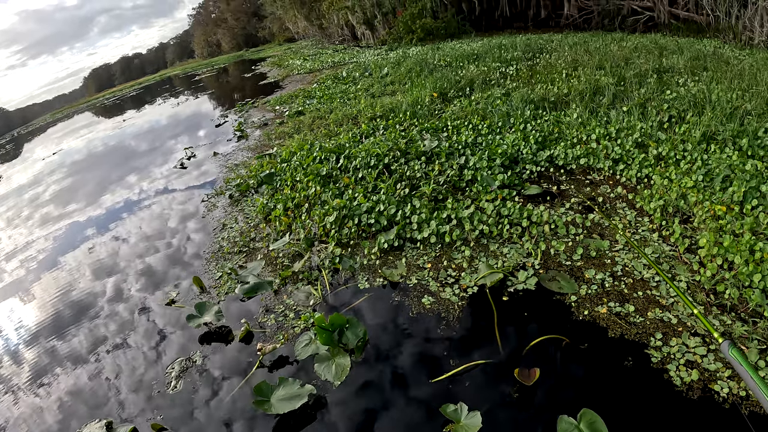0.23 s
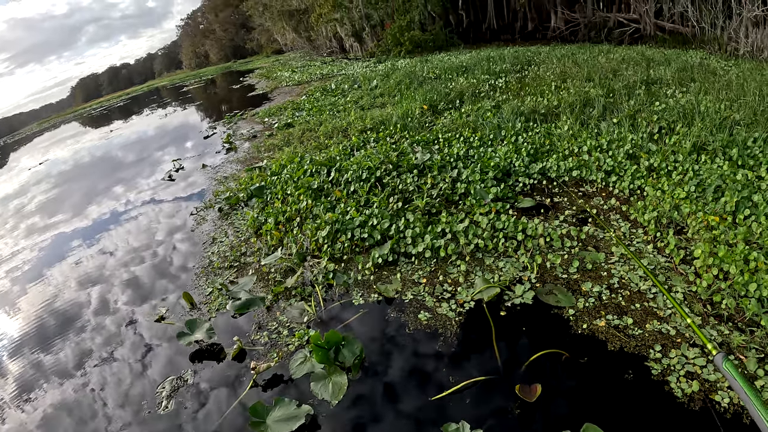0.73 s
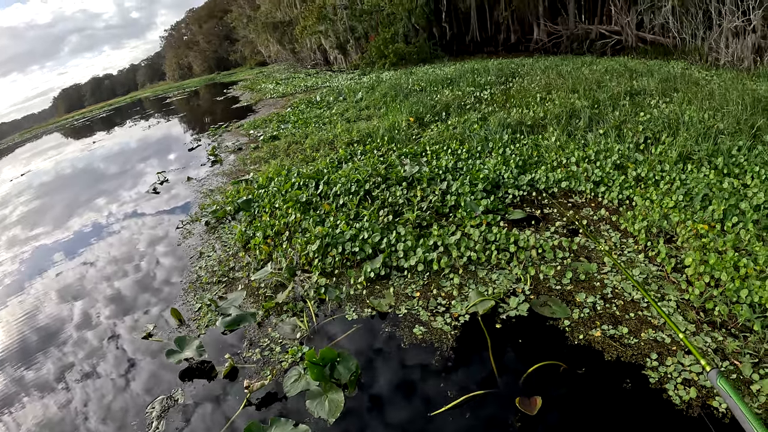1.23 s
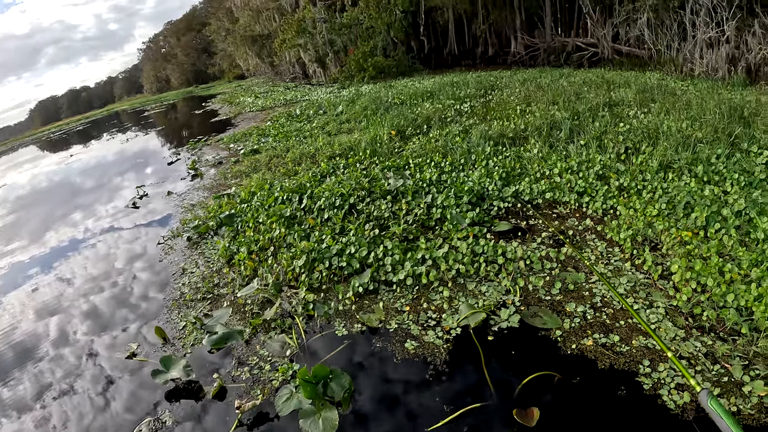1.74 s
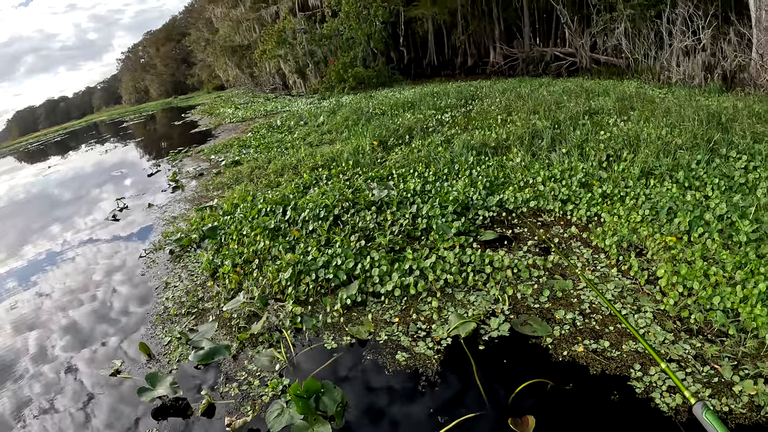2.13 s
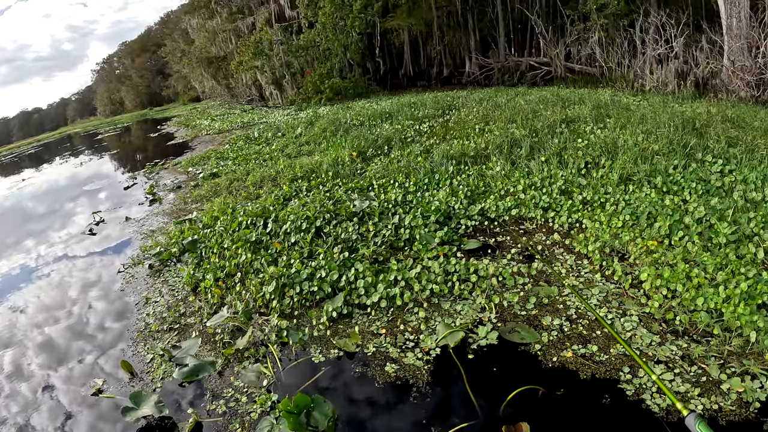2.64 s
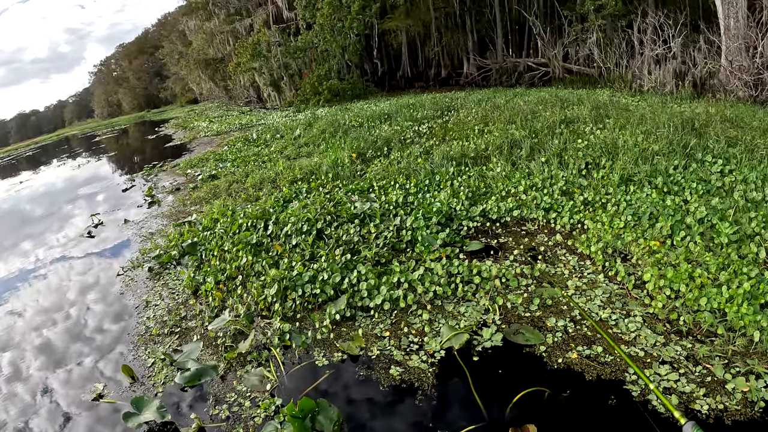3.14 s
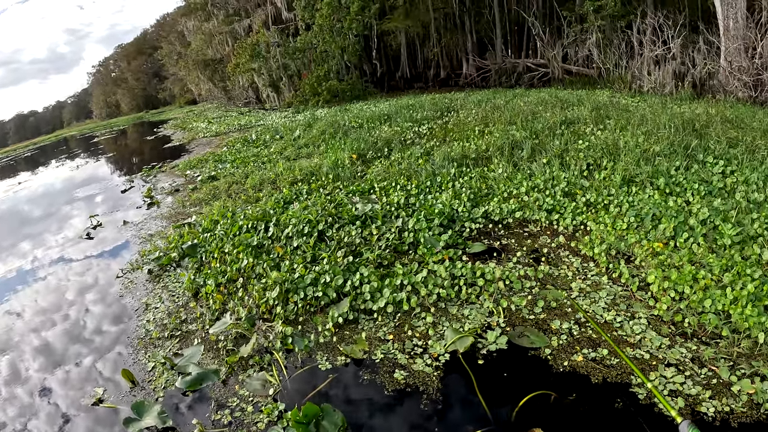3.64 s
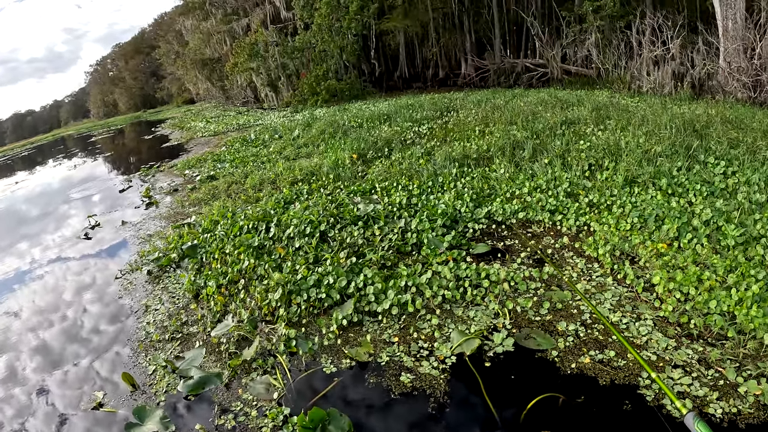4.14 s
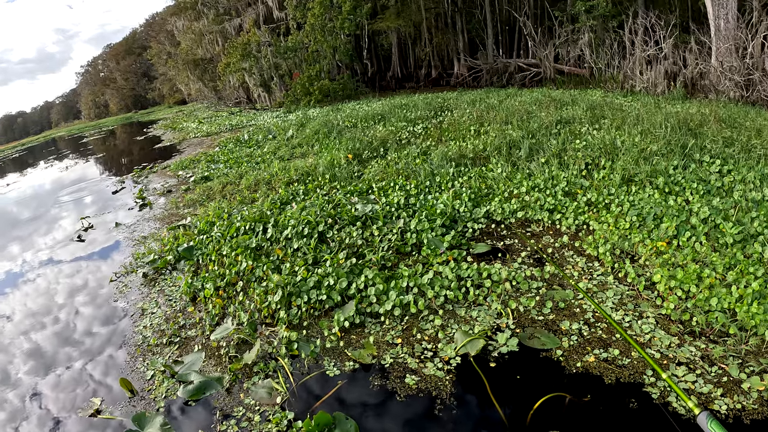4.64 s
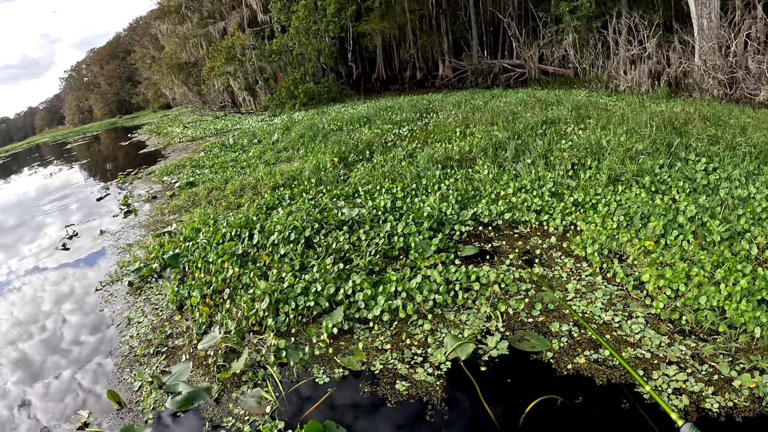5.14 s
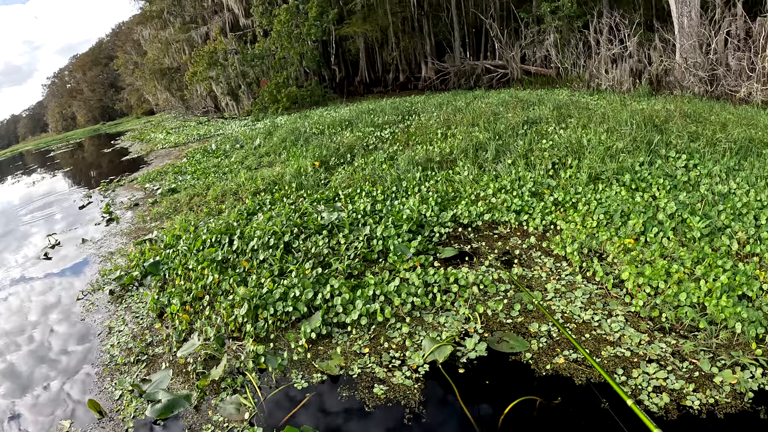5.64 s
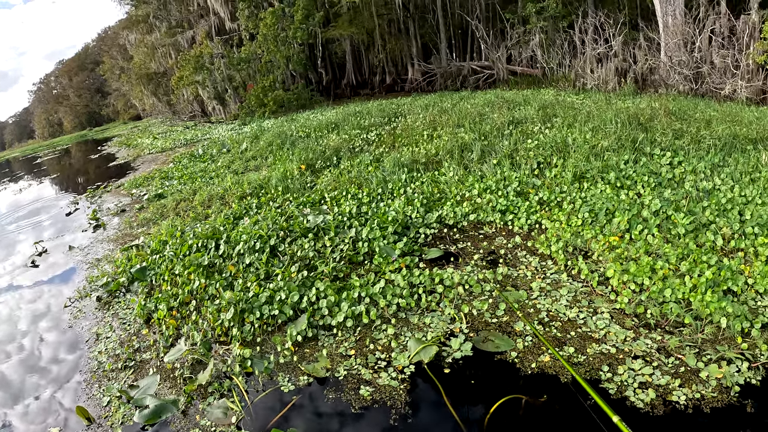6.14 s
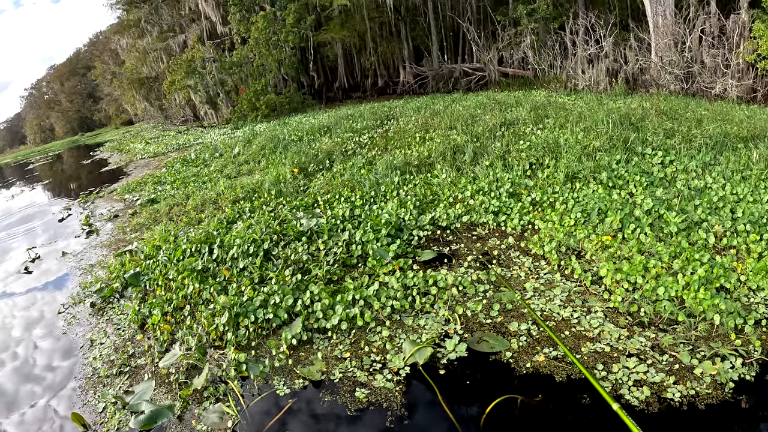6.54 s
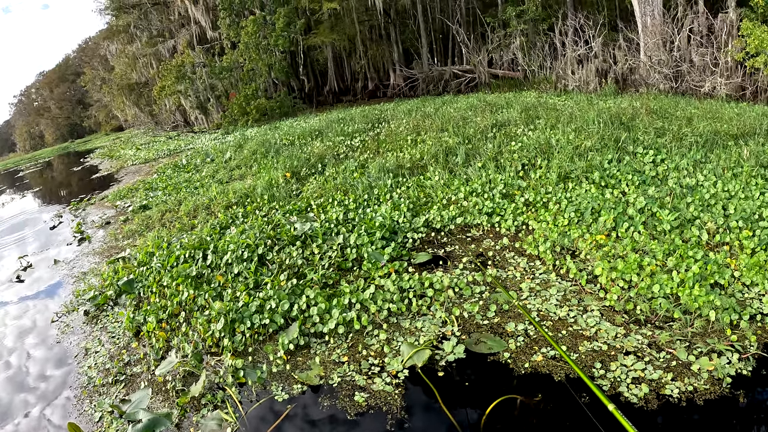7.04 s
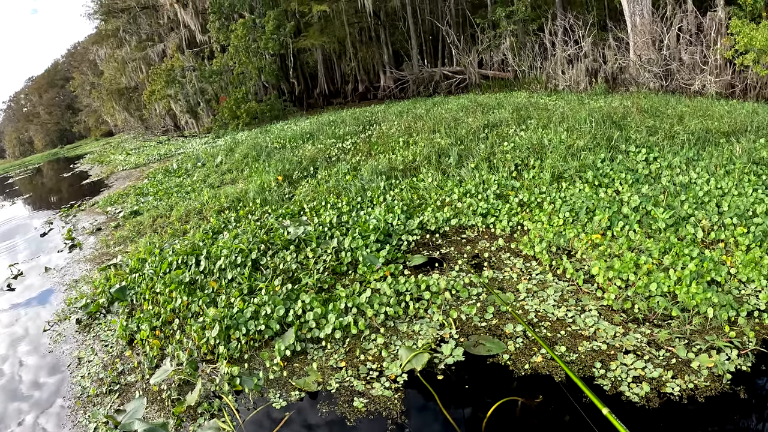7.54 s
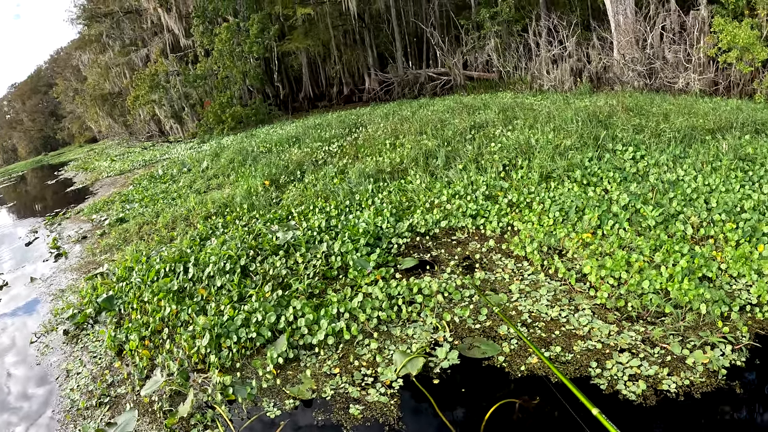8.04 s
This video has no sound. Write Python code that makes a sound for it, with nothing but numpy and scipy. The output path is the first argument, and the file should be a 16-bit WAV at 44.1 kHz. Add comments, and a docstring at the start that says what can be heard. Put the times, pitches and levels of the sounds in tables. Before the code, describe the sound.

Crickets trill and a katydid ticks into a swelling rasp amid steady insect hiss, with small bird chips, faint water and a far helicopter's rumble.

```python
"""Insects at a marshy river edge

A dense insect chorus hisses in the weeds: noise filtered to the colour of many wings. Crickets trill with
short sagging tones, and a near katydid ticks, then buzzes, as rasping noise shaped by wing strokes.
A small bird gives thin falling chips, which are gliding tones. A far helicopter throbs with pulses and
tones that sink in pitch, over a low noise rumble and a faint hum; water laps and snaps softly.
"""
import sys
import numpy as np
from scipy import signal
from scipy.fft import rfft, irfft, next_fast_len
from scipy.io import wavfile
from scipy.ndimage import uniform_filter1d

SR = 44100
rng = np.random.default_rng(int(sys.argv[2]) if len(sys.argv) > 2 else 0)


def transcribe(u):
    """Save the signal u as a 16-bit wav file named by the first command-line argument.

    u: samples, shape (n,) or (channels, n), limited to [-1, 1]; the rate is SR.
    q: integer samples, one column per channel.
    """
    v = np.clip(np.atleast_2d(u).T, -1, 1)
    q = np.round(v * 32767).astype(np.int16)
    wavfile.write(sys.argv[1], SR, q)


N = 365148
T = np.arange(N) / SR  # time of every sample, in seconds

# massed insects, loudness over time: t/s, level/dB
CHORUS_LEVEL = [(0.15, -58), (0.85, -57), (1.35, -57.5), (1.65, -56), (2.15, -58), (2.65, -56.5),
                (3.35, -58.5), (3.7, -55.5), (4.4, -57.5), (4.9, -57), (5.05, -56.5), (5.9, -56),
                (6.55, -55), (7.25, -56.5), (8.15, -56.5)]
# massed insects, tone colour: f/Hz, density/(dB per Hz)
CHORUS_COLOUR = [(3600, -28), (4000, -24), (4500, -15.5), (5200, -4.5), (6000, -3.5), (6700, 1.5),
                 (7600, 4.5), (8100, -1.5), (9000, -2), (9900, 1), (11000, -8.5), (13000, -12),
                 (15500, -35)]
# a nearer insect's chirring bouts: start/s, end/s, level/dB
CHIRR_BOUTS = [(.79, .93, -64), (2.31, 2.83, -65.5), (4.83, 4.96, -62), (5.13, 5.3, -67)]
CHIRR_HZ, CHIRR_WIDTH_HZ, CHIRR_STROKE_HZ = 6900, 1000, 58.6

# trilling cricket's phrases: start/s, end/s, level/dB
CRICKET_PHRASES = [(-.05, .42, -71), (.46, .72, -70), (.8, 1.04, -69), (1.23, 1.38, -72.5),
                   (1.55, 1.81, -68.5), (1.96, 2.25, -69.5), (2.33, 2.65, -70.5), (2.74, 3.1, -70),
                   (3.27, 3.52, -69), (3.6, 3.87, -68.5), (3.97, 4.28, -68), (4.4, 4.73, -67),
                   (4.93, 5.3, -67), (5.41, 5.68, -66.5), (5.83, 6.13, -69), (6.22, 6.68, -70.5),
                   (6.82, 7.08, -70), (7.23, 7.5, -71.5), (7.62, 7.92, -70.5), (8.0, 8.35, -70.5)]
# carrier pitch, wing stroke rate and fall in pitch within a stroke
CRICKET_HZ, CRICKET_STROKE_HZ, CRICKET_SAG_HZ = 5460, 70.5, 950
HIGH_CRICKET_HZ, HIGH_CRICKET_STROKE_HZ, HIGH_CRICKET_SAG_HZ = 5710, 68, 400
# the higher cricket's level at time zero and how fast it grows
HIGH_CRICKET_DB, HIGH_CRICKET_DB_PER_S = -74.5, .5
CHIRP_FIRST_S, CHIRP_EVERY_S, CHIRP_LENGTH_S = .2, .351, .16
PHRASE_FADE_S = .01  # for the crickets and the chirring insect

# near katydid's wing, pressed lightly: f/Hz, density/(dB per Hz)
SOFT_WING = [(7000, -28), (8800, -13), (9400, -7), (9850, 1), (10150, -6), (10450, -3), (11000, -17),
             (11700, -13), (13000, -21), (13700, -19), (15500, -31)]
# the same wing pressed hard, its upper resonance comes out: f/Hz, density/(dB per Hz)
HARD_WING = [(7000, -26), (9000, -12), (9850, 0), (10350, -2), (10850, 0), (11150, -2), (11500, -13),
             (12200, -11.5), (13500, -14), (15500, -26)]
# near katydid's single strokes: t/s, level before the stroke's shape/dB, wing pressure/(0-1)
TICKS = [(3.304, -58.5, 1), (3.427, -60, 1), (3.532, -59, 1), (3.634, -58, 1), (3.765, -60, 1),
         (3.905, -61, 1), (4.02, -59.5, 1), (4.127, -57.5, 1), (4.229, -58, 1), (4.345, -61, 1),
         (4.46, -59, 1), (4.555, -52.5, 1), (4.677, -51.5, 1), (4.835, -52, 1), (4.975, -51.5, .7),
         (5.703, -49.5, .6), (5.808, -50.5, .4), (5.884, -48.3, .35), (5.963, -49, .4), (6.045, -47, .15),
         (6.124, -47.5, .5)]
BUZZ_STROKE_HZ, BUZZ_FIRST_S = 33.35, 6.244  # stroke rate, and the start of one stroke
BUZZ_START_S, BUZZ_END_S, BUZZ_FADE_S = 6.19, 7.455, .02
# level at the end before the stroke shape, how far below it starts, and the final wing pressure (0-1)
BUZZ_DB, BUZZ_SWELL_DB, BUZZ_END_PRESSURE = -49, 5.5, .8

# far katydids' wings: f/Hz, density/(dB per Hz)
FAR_WING = [(7000, -35), (8800, -8), (9900, -2), (10800, -3), (12200, -7.5), (13500, -13.5), (15500, -32)]
# far katydids' bouts of buzzing: start/s, end/s, level/dB
FAR_BOUTS = [(.15, 3.37, -64), (3.351, 4.6, -65), (4.35, 8.6, -62.5)]
FAR_FADE_S = .44

# bird chips: end/s, length/s, reference top pitch f/Hz, share by which the pitch falls/(0-1),
# time constant of the fall/s, level before the chip's shape/dB, strength sent to the echo/dB
CHIPS = [(.386, .037, 5800, .34, .0105, -50.5, -13), (1.533, .035, 5850, .35, .011, -53.5, -9),
         (2.345, .029, 5650, .32, .012, -55, -5), (3.313, .035, 5550, .35, .012, -56, -7),
         (3.929, .036, 5480, .44, .0075, -63.5, -4), (4.164, .044, 5130, .42, .007, -55.5, -4),
         (5.279, .037, 5240, .46, .0048, -51.5, -2), (5.86, .037, 5380, .46, .0063, -51, -3),
         (6.755, .035, 5330, .46, .0058, -51.5, -3), (8.262, .037, 5200, .44, .0058, -57, -4)]
# every chip follows one pitch arch: share it first rises by, the rise's time constant, the arch's length
CHIP_RISE, CHIP_RISE_S, CHIP_ARCH_S = .17, .005, .044
# depth and speed of the flutter, and the time the echo takes to fall by 60 dB
CHIP_FLUTTER_DB, CHIP_FLUTTER_HZ, CHIP_ECHO_T60_S = 2.4, 380, .38

# tail rotor's fundamental fading in and out: t/s, level/dB
TAIL_ROTOR = [(0, -53), (1.9, -54.5), (3.0, -51.5), (4.1, -49.5), (4.7, -55), (5.15, -65), (5.4, -54),
              (5.85, -46.5), (6.25, -60), (6.95, -55), (7.5, -62), (8.1, -56)]
# swells of the tail rotor's whine: partial number, loudest at t/s, length/s, level/dB
WHINE = [(2, .1, .6, -51), (2, 1.1, .85, -50), (2, 3.38, .5, -50.5), (2, 4.25, .5, -51),
         (2, 5.25, .35, -54), (2, 6.45, .3, -54), (2, 7.2, .35, -51), (3, .35, .65, -48),
         (3, 1.4, .75, -52), (3, 3.45, .2, -60), (3, 4.3, .32, -50), (3, 4.8, .2, -57), (3, 6, .3, -54.5),
         (3, 8.25, .5, -53), (4, .3, .65, -58), (4, 1.25, .55, -60), (4, 2.2, .75, -60), (4, 3.7, .9, -67),
         (5, 2.5, .8, -69), (5, 4.85, .6, -65), (6, 2.5, .9, -71)]
# the tail rotor's blade rate holds, then sinks steadily
BLADE_HZ, SINK_FROM_S, SINK_HZ_PER_S = 89.5, 3.25, 1.8
TAIL_PER_MAIN = 6.52  # tail blade beats for each main blade beat
# main rotor's slap, thrown forward and first to arrive: loudest at t/s, half width/s, level/dB
SLAP_LOBE = (1.03, 0.95, -42.3)
# main rotor's thud: loudest at t/s, half width/s, level/dB
THUD_LOBE = (2.65, 1.0, -41.3)
# main rotor's downwash: loudest at t/s, half width/s, level/dB
WASH_LOBE = (2.68, 2.84, -47)

# soft laps and rustles among the leaves: t/s, length/s, centre f/Hz, width f/Hz, level/dB
LAPS = [(.733, .052, 1500, 1250, -65.5), (1.22, .035, 1150, 600, -70.5), (3.88, .06, 1400, 1200, -72),
        (4.826, .035, 1150, 1100, -68.5), (5.205, .06, 1350, 1500, -68), (6.255, .02, 1350, 900, -69),
        (6.48, .045, 2500, 2200, -76), (6.734, .012, 2300, 2000, -66), (6.98, .015, 1650, 1800, -73)]
# small snaps and drips in the stems: t/s, centre f/Hz, width f/Hz, peak level/dB
SNAPS = [(.201, 2400, 500, -64), (2.0454, 4300, 5000, -44.5), (2.0477, 3500, 3000, -61),
         (6.248, 1400, 500, -53), (6.731, 1900, 1400, -56), (6.874, 3200, 1500, -63),
         (6.977, 1650, 700, -60)]
# a ripple knocks softly on the boat: t/s, centre f/Hz, width f/Hz, peak level/dB
KNOCK = (5.183, 135, 60, -34)

# steady far hum: f/Hz, middle level/dB
HUM = [(22.4, -55), (63.3, -53)]

# rumble's deep part: f/Hz, density/(dB per Hz)
DEEP_COLOUR = [(7, -16), (14, -13.5), (22, -3), (31, -3), (41, -3), (50, -7.5), (63, -1), (76, -5),
               (92, -1.5), (115, -14), (160, -19.5)]
# rumble's body: f/Hz, density/(dB per Hz)
BODY_COLOUR = [(80, -45), (115, -1), (165, -1), (210, -5), (290, -7.5), (350, -12), (430, -24.5),
               (600, -55)]
# rumble's upper part: f/Hz, density/(dB per Hz)
UPPER_COLOUR = [(280, -9), (400, -0.5), (520, -3), (680, -8), (850, -18.5), (1300, -29)]
# open air: f/Hz, density/(dB per Hz)
AIR_COLOUR = [(500, 1), (850, -3.5), (1050, 4.5), (1350, 2), (1700, -4.5), (2300, -12), (3200, -14.5),
              (5000, -19.5), (15000, -49)]
# rumble's upper part, loudness over time: t/s, level/dB
UPPER_LEVEL = [(0.15, -62.5), (0.75, -63.5), (2.7, -60), (3.8, -62.5), (4.85, -61.5), (5.65, -62.5),
               (6.5, -59.5), (8.15, -62.5)]
# rumble swells in higher bands: loudest at t/s, length/s, centre f/Hz, width f/Hz, level/dB
RUMBLE_SWELLS = [(2.57, 0.84, 497, 110, -65), (7.27, 2.4, 275, 120, -56.5), (7, 1.4, 705, 240, -69.5)]
DEEP_DB = -47  # steady share, the downwash adds to it
# the body starts here and fills out as the helicopter moves off: start level, rise, its middle and length
BODY_DB, BODY_RISE_DB, BODY_RISE_S, BODY_RISE_LENGTH_S = -49, 2.5, 8.1, 3
# breeze in the far trees, which freshens once: start level, rise, its middle and length
BREEZE_DB, FRESHEN_DB, FRESHEN_S, FRESHEN_LENGTH_S = -69.5, 1.5, 5.2, 3.9

TOP_HZ = 15600  # the treble ends here


def undb(db):
    """Turn decibels into a gain."""
    return 10 ** (np.asarray(db) / 20)


def curve(rows):
    """Turn a table of times and decibels into a gain for every sample."""
    times, db = np.transpose(rows)
    return undb(np.interp(T, times, db))


def unit(x):
    """Scale a sound to an average strength (rms) of 1."""
    return x / np.sqrt(np.mean(x ** 2))


def colour(x, points):
    """Shape the spectrum along an outline of (Hz, dB) points, nearly silent outside it; rms 1."""
    hz, db = np.transpose(points)
    size = next_fast_len(N)
    f = np.arange(size // 2 + 1) * SR / size
    outline_db = np.interp(np.log(f + 1e-9), np.log(hz), db, left=-90, right=-90)
    return unit(irfft(rfft(x, size) * undb(outline_db), size)[..., :N])


def band(x, hz, width_hz):
    """Ring a resonance, applied twice for steeper sides; rms 1."""
    b, a = signal.iirpeak(hz, hz / width_hz, fs=SR)
    once = signal.lfilter(b, a, x)
    return unit(signal.lfilter(b, a, once))


def walk(rate):
    """Wander smoothly at random around zero, with about `rate` new targets a second; rms 1."""
    k = max(int(SR / rate), 2)
    steps = np.repeat(rng.standard_normal(N // k + 2), k)
    held = steps[rng.integers(k):][:N]
    return unit(uniform_filter1d(held, k))


def place(x, pan_db):
    """Set a sound in stereo; positive values lean to the left."""
    return np.outer(undb([pan_db / 2, -pan_db / 2]), x)


def noise(side_db, pan_db=0):
    """Stereo noise: a shared middle, plus a side part that makes it wide."""
    mid, side = rng.standard_normal((2, N))
    return place(mid, pan_db) + np.outer([1, -1], side) * undb(side_db)


def swell(at, length):
    """A bell-shaped rise and fall in gain."""
    return np.exp(-2 * np.minimum(((T - at) / length) ** 2, 20))


def gate(start, end, fade_s):
    """Fade in, hold, fade out."""
    return np.clip(np.minimum(T - start, end - T) / fade_s, 0, 1)


def phrased(rows):
    """Gain of an insect that sings in phrases."""
    return sum(undb(db) * gate(start, end, PHRASE_FADE_S) for start, end, db in rows)


def lobe(at, width, db):
    """Gain of a passing source whose beam sweeps over the listener."""
    return undb(db) / (1 + ((T - at) / width) ** 2)


def ramp(at, length):
    """An even rise from 0 to 1, centred on a moment."""
    return np.clip((T - at) / length + .5, 0, 1)


def trees(x, t60, wet_db):
    """Add the scatter from the tree line: a fading tail of noise, different in each ear."""
    t = np.arange(SR // 2) / SR
    fade = undb(-60 * t / t60) * (1 - np.exp(-t / .0012))
    tail = rng.standard_normal((2, len(t))) * fade
    tail /= np.sqrt(np.sum(tail ** 2) / 2)
    return x + undb(wet_db) * signal.fftconvolve(x, tail, axes=1)[:, :N]


def chorus():
    """Countless far wings merge into a hiss that surges and shimmers; a nearer singer chirrs in bouts."""
    hiss = colour(noise(side_db=-10.5, pan_db=-.9), CHORUS_COLOUR)
    shimmer = undb(.4 * walk(6) + .51 * walk(70))
    stroke_rate = CHIRR_STROKE_HZ * (1 + .015 * walk(5))
    strokes = unit(1 + .8 * np.cos(2 * np.pi * np.cumsum(stroke_rate) / SR))
    chirr = band(noise(side_db=-11), CHIRR_HZ, CHIRR_WIDTH_HZ) * strokes * phrased(CHIRR_BOUTS)
    return hiss * curve(CHORUS_LEVEL) * shimmer + chirr


def trill(hz, stroke_hz, sag_hz):
    """A cricket: each wing closure is a short tone that sags in pitch."""
    stroke = np.cumsum(stroke_hz * (1 + .004 * walk(4))) / SR % 1  # 0 to 1 within each stroke
    pitch = hz + sag_hz * (.5 - stroke) + 40 * walk(120) + 20 * walk(2.9)
    tone = np.sin(2 * np.pi * np.cumsum(pitch) / SR)
    return unit(np.sin(np.pi * stroke) ** 4 * tone) * undb(.7 * walk(25))


def crickets():
    """One cricket trills in phrases with short rests; a higher one chirps evenly; a third goes on far back."""
    near = place(trill(CRICKET_HZ, CRICKET_STROKE_HZ, CRICKET_SAG_HZ), -1.1) * phrased(CRICKET_PHRASES)
    starts = np.arange(CHIRP_FIRST_S, T[-1], CHIRP_EVERY_S)
    chirps = [(s, s + CHIRP_LENGTH_S, HIGH_CRICKET_DB + HIGH_CRICKET_DB_PER_S * s) for s in starts]
    high_trill = trill(HIGH_CRICKET_HZ, HIGH_CRICKET_STROKE_HZ, HIGH_CRICKET_SAG_HZ)
    high = place(high_trill, 0) * phrased(chirps)
    far = place(trill(5300, stroke_hz=68, sag_hz=895), .47) * undb(-80)
    return trees(near + high + far, t60=.15, wet_db=-11)


def rasp(wing, rough_db, side_db, pan_db):
    """File teeth catch unevenly, some 900 times a second, and ring the wing."""
    catches = noise(side_db, pan_db) * undb(rough_db * walk(900))
    return colour(catches, wing)


def near_katydid():
    """Single strokes quicken into a run that swells and stops dead; each stroke builds, then lets go."""
    hard = rasp(HARD_WING, rough_db=3, side_db=-11, pan_db=1.5)
    soft = rasp(SOFT_WING, rough_db=1.5, side_db=-14, pan_db=1)

    def wing(pressure):
        """Blend the soft and hard wing sounds by pressure."""
        return np.sqrt(pressure) * hard + np.sqrt(1 - pressure) * soft

    ticks = np.zeros((2, N))
    for s, db, pressure in TICKS:
        stroke = np.interp(T - s, [-.014, 0, .009], [0, 1.1, 0])
        ticks += undb(db) * stroke * wing(pressure)

    cycle = BUZZ_STROKE_HZ * (T - BUZZ_FIRST_S) % 1
    strokes = np.interp(cycle, [0, .15, .5, .62, .76, 1], [.035, .4, .99, .8, .22, .038])
    # the buzz grows louder and is pressed harder towards its end
    progress = np.clip((T - BUZZ_START_S) / (BUZZ_END_S - BUZZ_START_S), 0, 1)
    pressure = BUZZ_END_PRESSURE * progress ** 2
    loudness = undb(BUZZ_DB - BUZZ_SWELL_DB * (1 - progress) ** 2)
    effort = gate(BUZZ_START_S, BUZZ_END_S, BUZZ_FADE_S) * loudness
    return trees(strokes * effort * wing(pressure) + ticks, t60=.14, wet_db=-19)


def bird():
    """Each chip flutters and swells as its pitch bends down, then dies away; the longest rise first."""
    direct, scattered = np.zeros((2, N))
    flutter = undb(CHIP_FLUTTER_DB * walk(CHIP_FLUTTER_HZ))
    waver = 1 + .005 * walk(CHIP_FLUTTER_HZ)
    for end, length, hz, fall, fall_s, db, echo_db in CHIPS:
        progress = np.clip((T - end) / length + 1, 0, 1)
        time_left = np.clip(end - T, 0, CHIP_ARCH_S)
        low_start = CHIP_RISE * np.exp((time_left - CHIP_ARCH_S) / CHIP_RISE_S)
        drop = fall * np.exp(-time_left / fall_s)
        pitch = waver * hz * (1 - low_start - drop)
        shape = np.interp(progress, [0, .15, .45, .64, .82, .9, .98, 1], [0, .42, .78, 1, .5, .18, .04, 0])
        tone = np.sqrt(2) * np.sin(2 * np.pi * np.cumsum(pitch) / SR)
        note = undb(db) * shape * flutter * tone
        direct += note
        # the low end of the note spreads wider, so more of it reaches the trees
        scattered += note * undb(echo_db) * (hz / pitch) ** 2
    sent = place(scattered, 0)
    echo = trees(sent, t60=CHIP_ECHO_T60_S, wet_db=-3) - sent  # keep only the tail
    return place(direct, -.5) + echo


def far_katydids():
    """A shuffling buzz in long bouts from deeper in the weeds."""
    stroke_rate = 31.3 * (1 + .022 * walk(2.53))
    strokes = unit(1 + .4 * np.cos(2 * np.pi * np.cumsum(stroke_rate) / SR))
    bouts = sum(undb(db) * gate(start, end, FAR_FADE_S) for start, end, db in FAR_BOUTS)
    return rasp(FAR_WING, rough_db=3, side_db=-8.5, pan_db=4.5) * strokes * bouts


def tail_rotor(turns):
    """A tone at the blade rate and its higher partials, each fading in and out in the air."""
    drone = np.zeros(N)
    for k in range(1, 7):
        if k == 1:
            size = curve(TAIL_ROTOR)
        else:
            size = sum(undb(db) * swell(s, length) for partial, s, length, db in WHINE if partial == k)
        flicker = undb(1.2 * walk(8))
        drone += size * flicker * np.sin(2 * np.pi * k * turns + .09 * k * walk(15))
    return np.sqrt(2) * drone


def main_rotor(turns):
    """Each blade sends out one pressure pulse, rounded by distance and repeated once, more softly, off the ground."""
    pulses = np.diff(np.floor(turns / TAIL_PER_MAIN), prepend=0) * undb(1.5 * walk(13))
    pulses = signal.sosfilt(signal.butter(5, 210, fs=SR, output="sos"), pulses)
    pulses = pulses + .35 * np.roll(pulses, int(.021 * SR))
    thud = unit(band(pulses, 47, 39) + undb(-2.5) * band(pulses, 14.8, 4.9)) * lobe(*THUD_LOBE)
    slap = band(pulses, 67.7, 100) * lobe(*SLAP_LOBE)
    return thud + slap


def helicopter():
    """Both rotors are geared together, so they sink in pitch together."""
    blade_hz = BLADE_HZ - SINK_HZ_PER_S * np.maximum(T - SINK_FROM_S, 0)
    turns = np.cumsum(blade_hz * (1 + .003 * walk(6))) / SR  # tail blade beats so far
    return place(tail_rotor(turns), .33) + place(main_rotor(turns), 0)


def snap(at, hz, width_hz):
    """One click with a brief ring; peak 1."""
    click = band(signal.unit_impulse(N, int(at * SR)), hz, width_hz)
    return click / np.abs(click).max()


def water():
    """Soft crackling laps among floating leaves, small snaps and drips in the stems, and one dull knock."""
    crackle = noise(side_db=-8) * undb(3.5 * walk(300))
    fizz = signal.sosfilt(signal.butter(3, 2500, fs=SR, output="sos"), crackle)
    laps = sum(band(fizz, hz, width) * swell(s, length) * undb(db) for s, length, hz, width, db in LAPS)
    snaps = sum(snap(s, hz, width) * undb(db) for s, hz, width, db in SNAPS)
    at, hz, width, db = KNOCK
    knock = snap(at, hz, width) * undb(db)
    return laps + trees(place(snaps + knock, 0), t60=.08, wet_db=-9)


def hum():
    """Low tones that waver in the distance."""
    tones = np.zeros(N)
    for hz, db in HUM:
        loudness = undb(db + 2 * walk(2))
        tones += loudness * np.sin(2 * np.pi * hz * T + .4 * walk(3))
    return place(np.sqrt(2) * tones, 0)


def rumble():
    """Low noise, alike in both ears at the bottom and wider higher up, under a light breeze in the trees."""
    deep = colour(noise(side_db=-48), DEEP_COLOUR) * np.hypot(undb(DEEP_DB), lobe(*WASH_LOBE))
    body_gain = undb(BODY_DB + BODY_RISE_DB * ramp(BODY_RISE_S, BODY_RISE_LENGTH_S))
    body = colour(noise(side_db=-16.5, pan_db=-.1), BODY_COLOUR) * body_gain
    upper = colour(noise(side_db=-7, pan_db=1), UPPER_COLOUR) * curve(UPPER_LEVEL)
    breeze_gain = undb(BREEZE_DB + FRESHEN_DB * ramp(FRESHEN_S, FRESHEN_LENGTH_S))
    air = colour(noise(side_db=-2.5), AIR_COLOUR) * breeze_gain
    swells = np.zeros((2, N))
    for s, length, hz, width, db in RUMBLE_SWELLS:
        swells += band(noise(side_db=-13.5), hz, width) * swell(s, length) * undb(db)
    return deep + body + upper + swells + air


def scene():
    """Add up all the voices of the marsh."""
    insects = chorus() + crickets() + near_katydid() + far_katydids()
    return insects + bird() + helicopter() + water() + hum() + rumble()


def record(dry):
    """Cut the highest treble steeply with a low-pass filter."""
    return signal.sosfilt(signal.ellip(10, .1, 70, TOP_HZ, fs=SR, output="sos"), dry)


dry = scene()
out = record(dry)
transcribe(out)
```